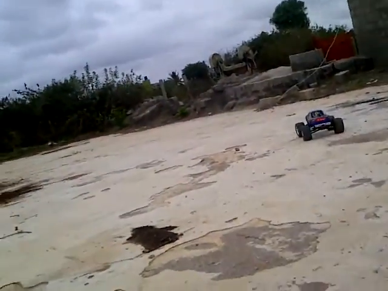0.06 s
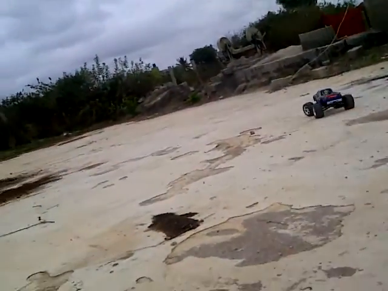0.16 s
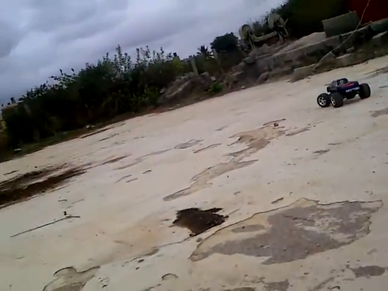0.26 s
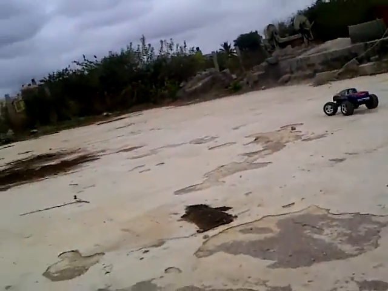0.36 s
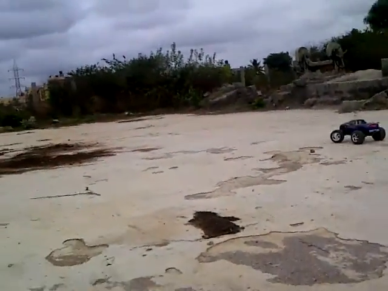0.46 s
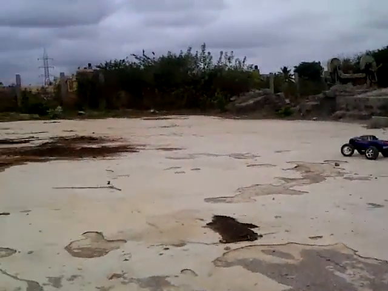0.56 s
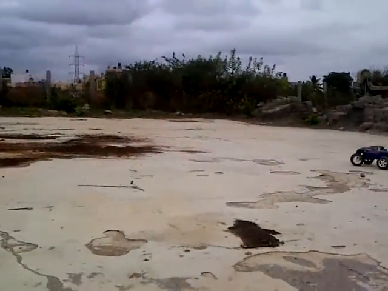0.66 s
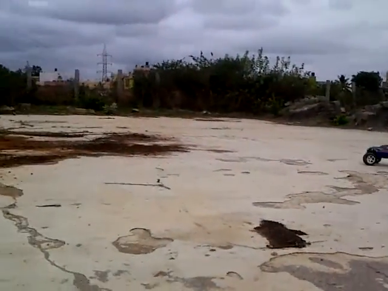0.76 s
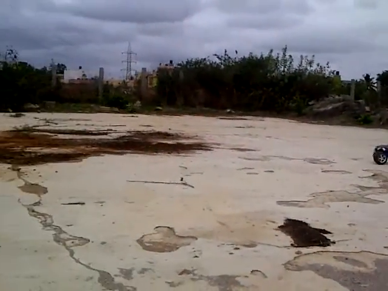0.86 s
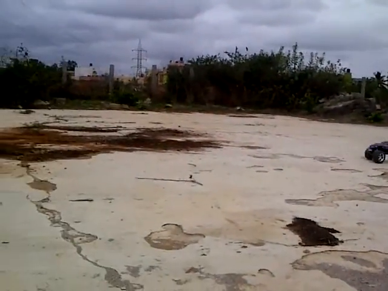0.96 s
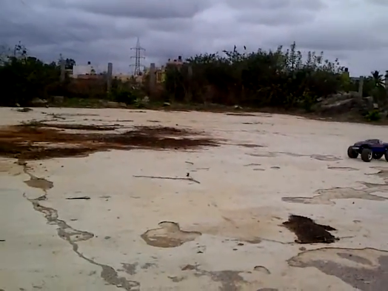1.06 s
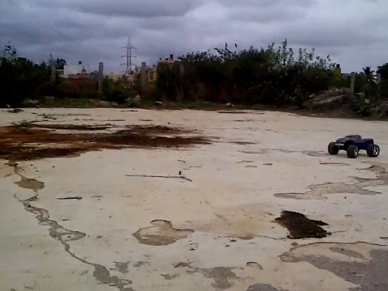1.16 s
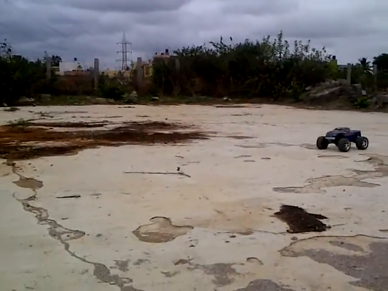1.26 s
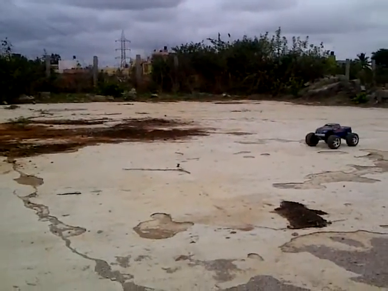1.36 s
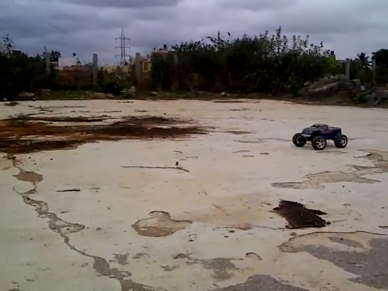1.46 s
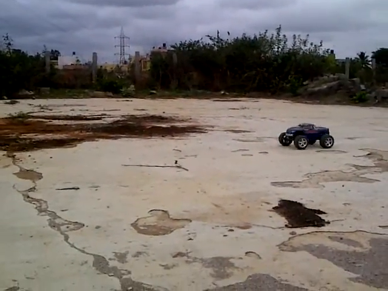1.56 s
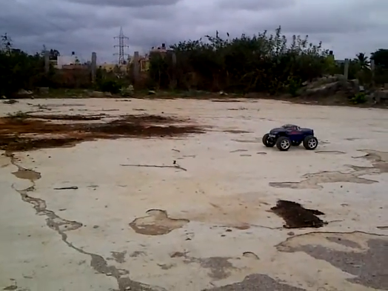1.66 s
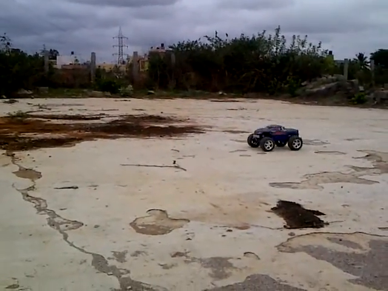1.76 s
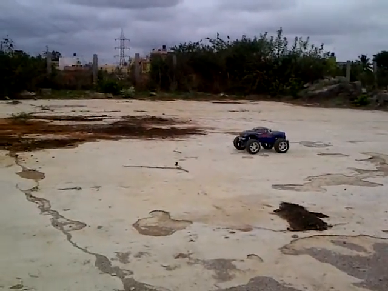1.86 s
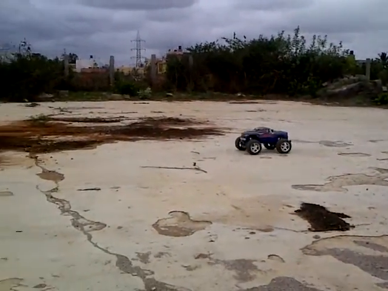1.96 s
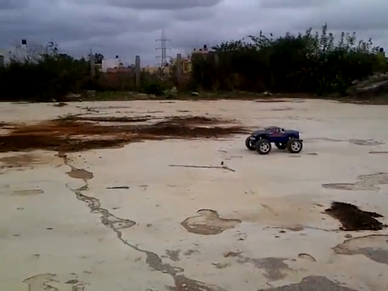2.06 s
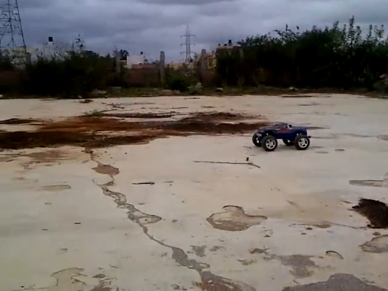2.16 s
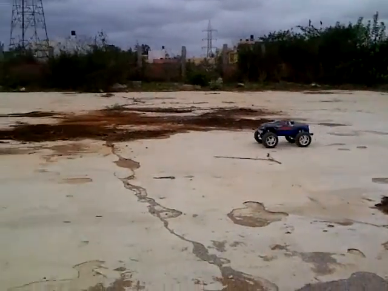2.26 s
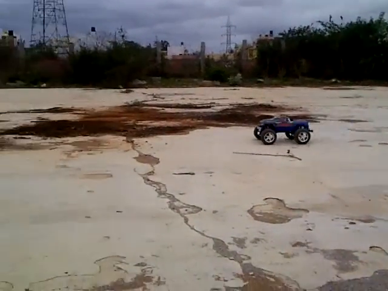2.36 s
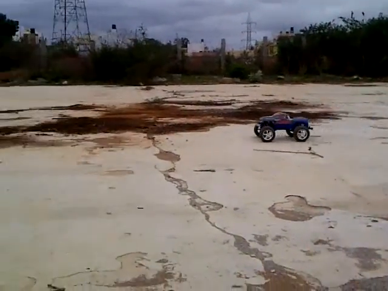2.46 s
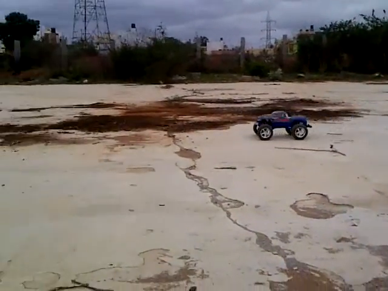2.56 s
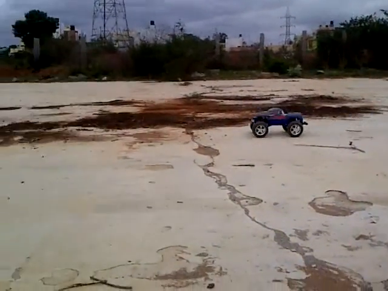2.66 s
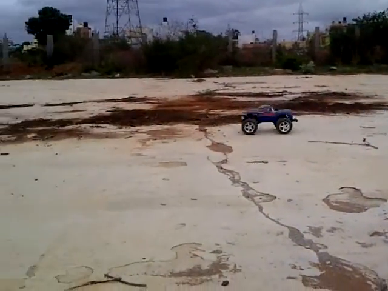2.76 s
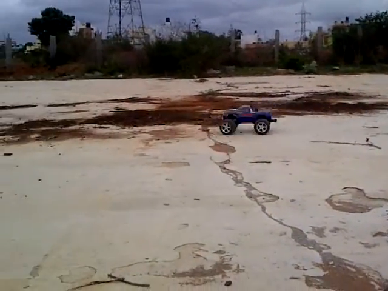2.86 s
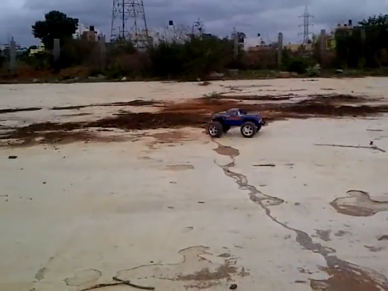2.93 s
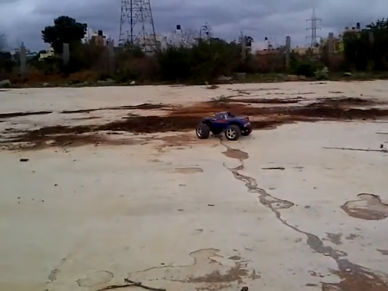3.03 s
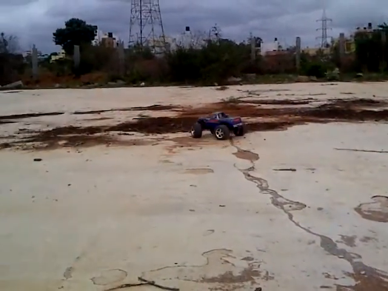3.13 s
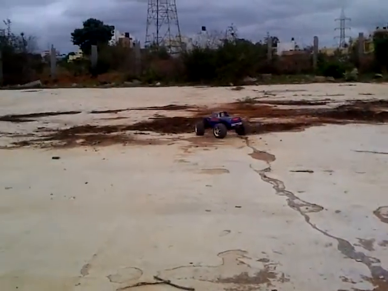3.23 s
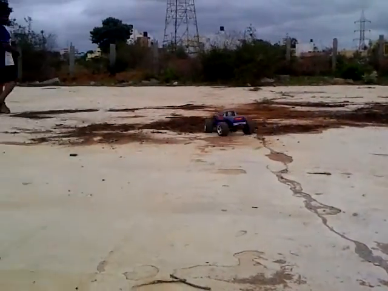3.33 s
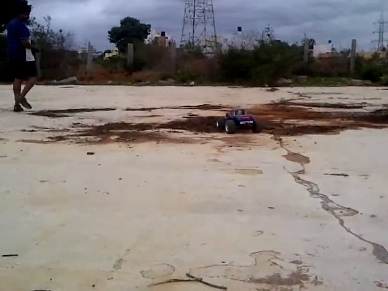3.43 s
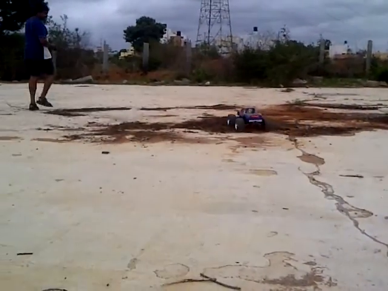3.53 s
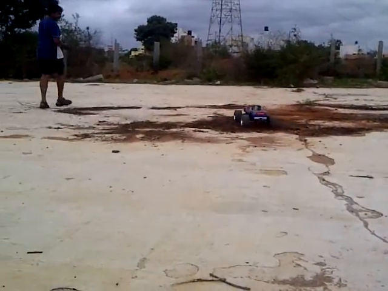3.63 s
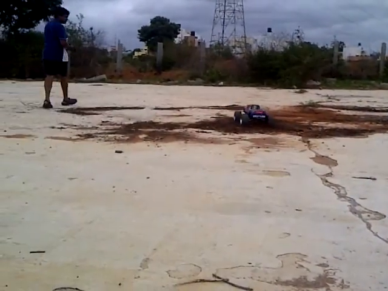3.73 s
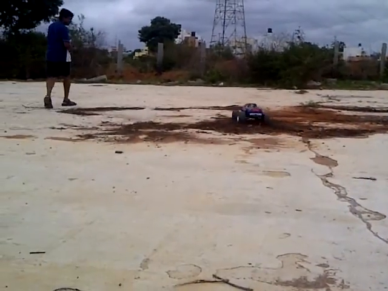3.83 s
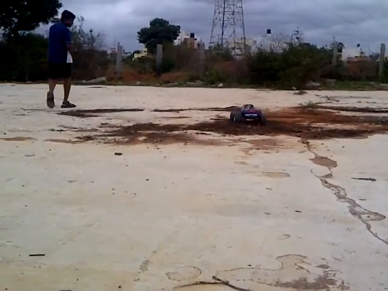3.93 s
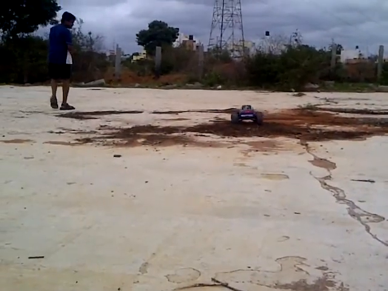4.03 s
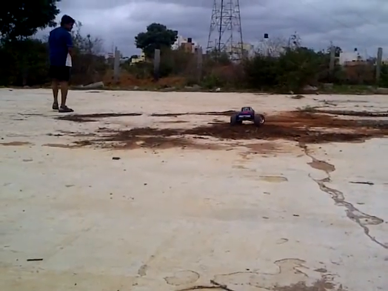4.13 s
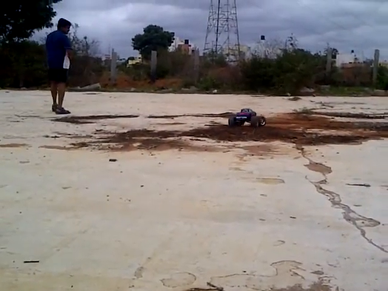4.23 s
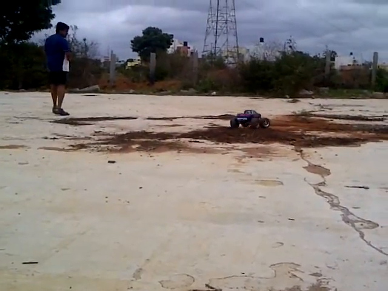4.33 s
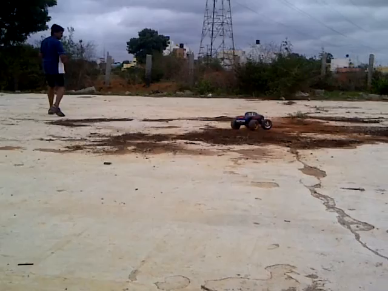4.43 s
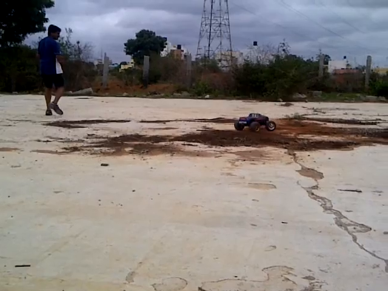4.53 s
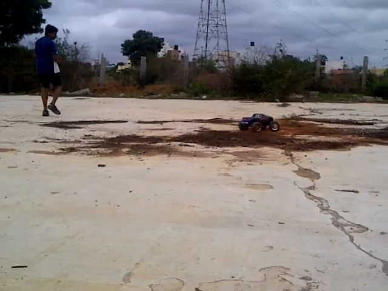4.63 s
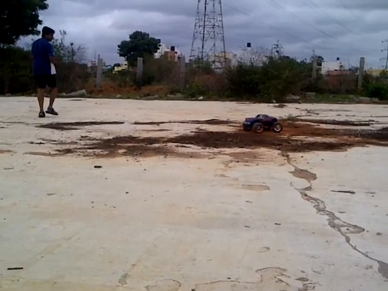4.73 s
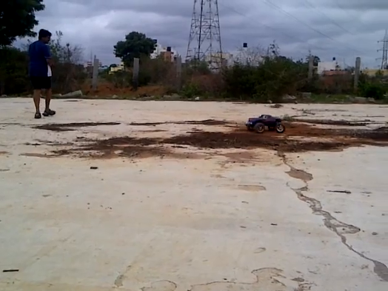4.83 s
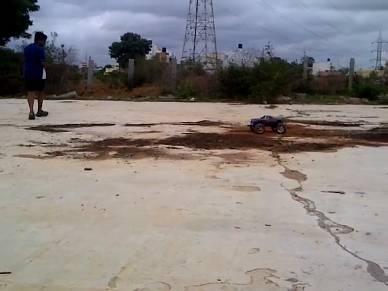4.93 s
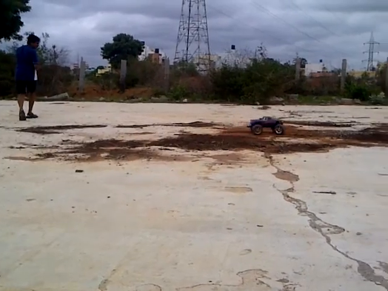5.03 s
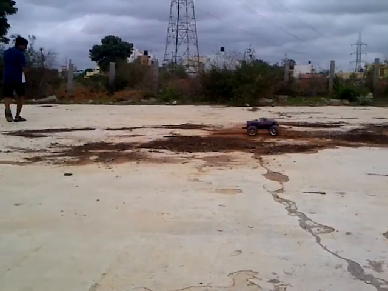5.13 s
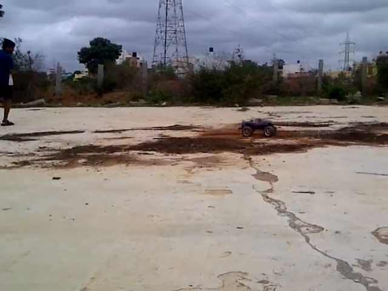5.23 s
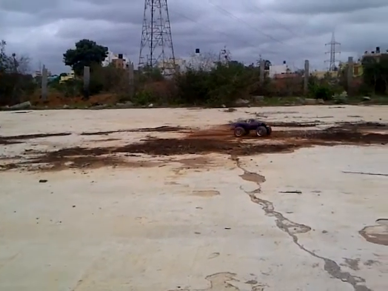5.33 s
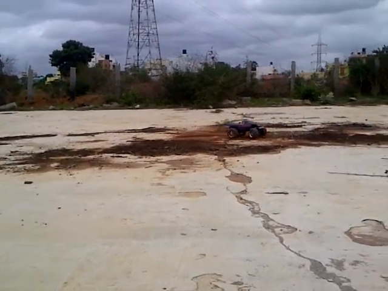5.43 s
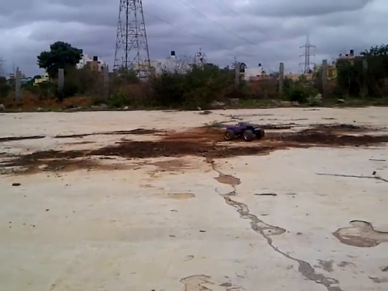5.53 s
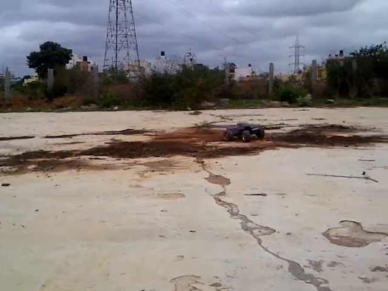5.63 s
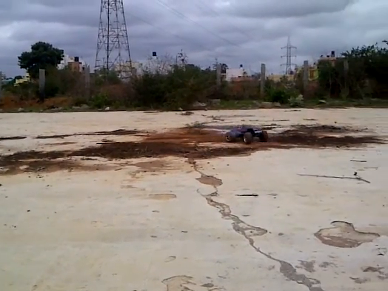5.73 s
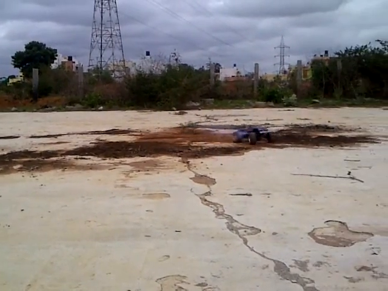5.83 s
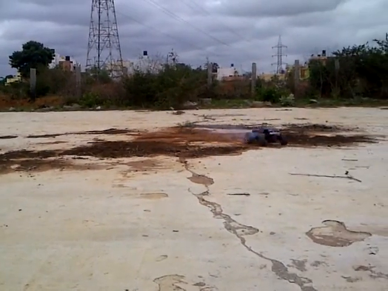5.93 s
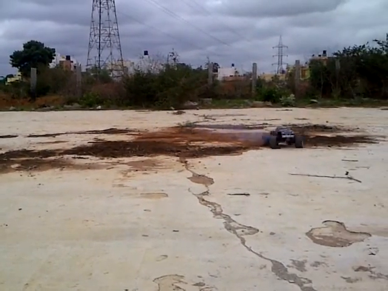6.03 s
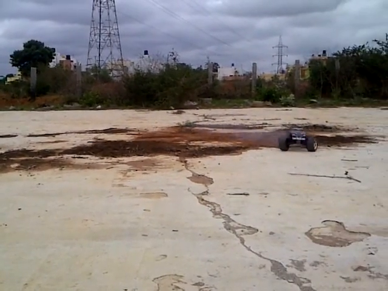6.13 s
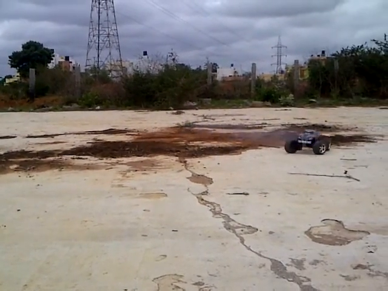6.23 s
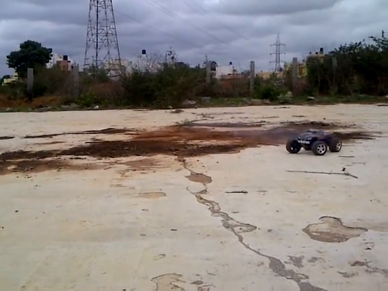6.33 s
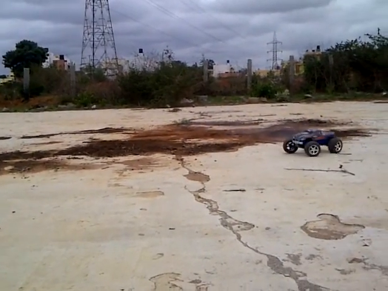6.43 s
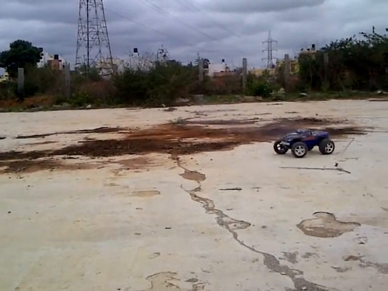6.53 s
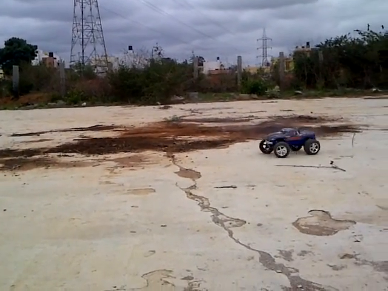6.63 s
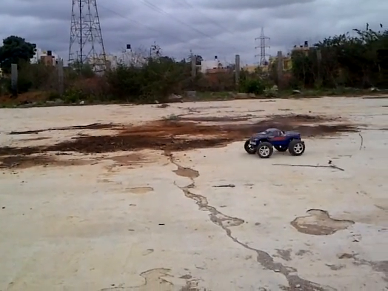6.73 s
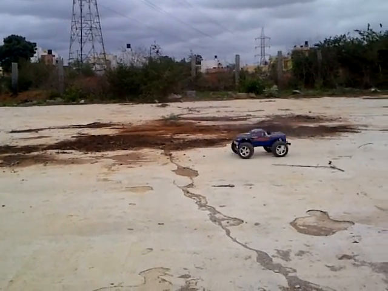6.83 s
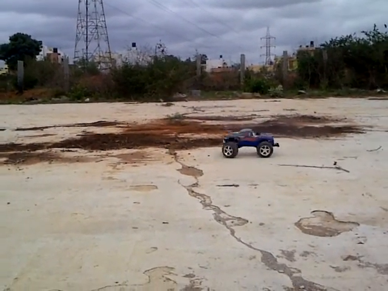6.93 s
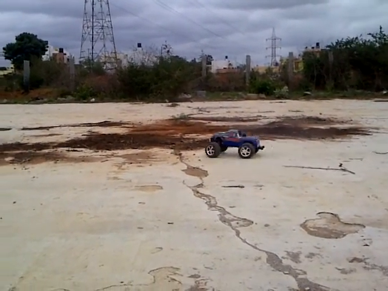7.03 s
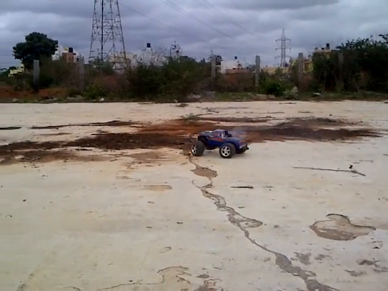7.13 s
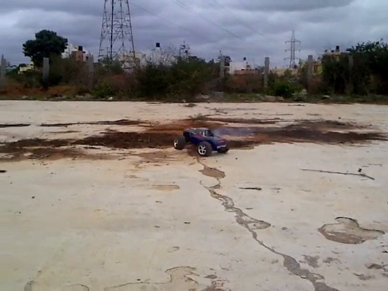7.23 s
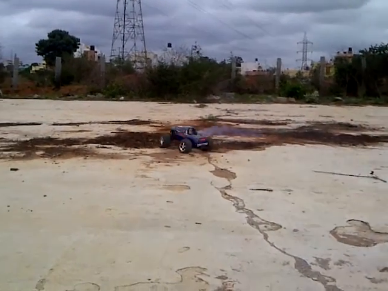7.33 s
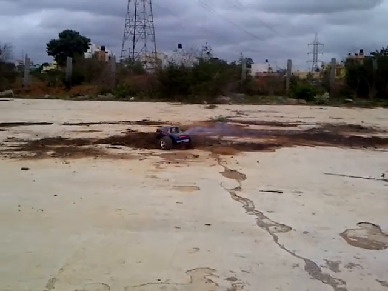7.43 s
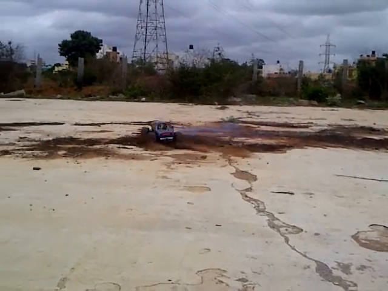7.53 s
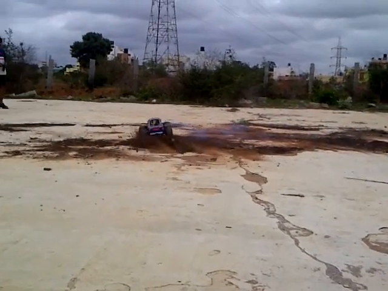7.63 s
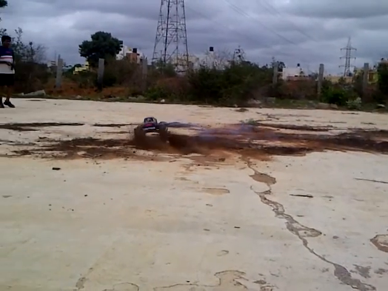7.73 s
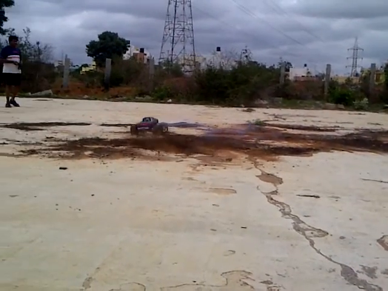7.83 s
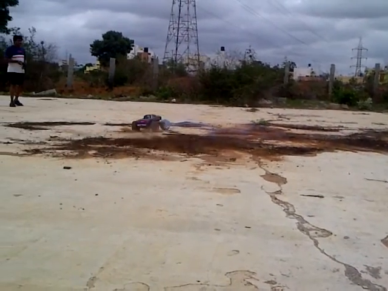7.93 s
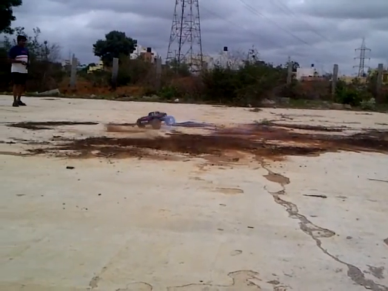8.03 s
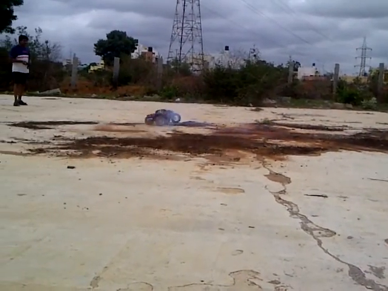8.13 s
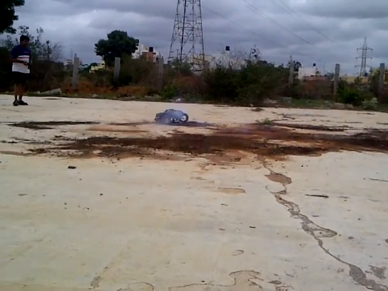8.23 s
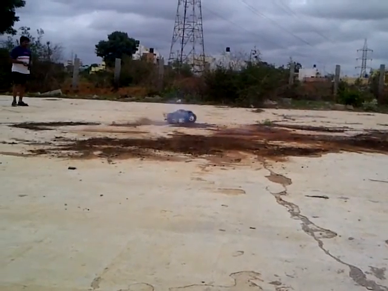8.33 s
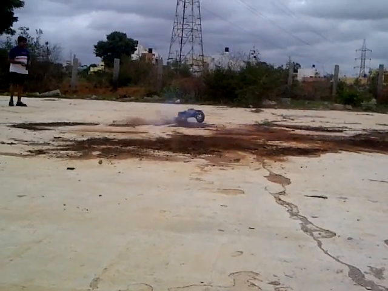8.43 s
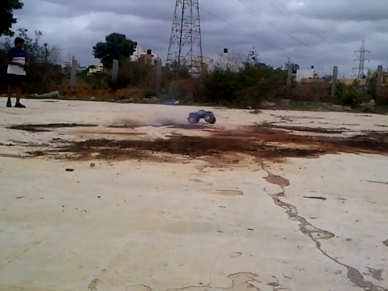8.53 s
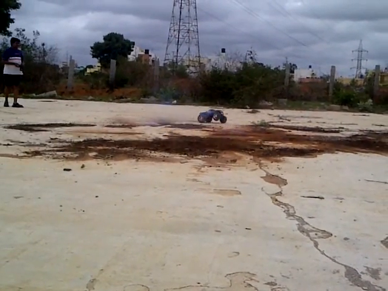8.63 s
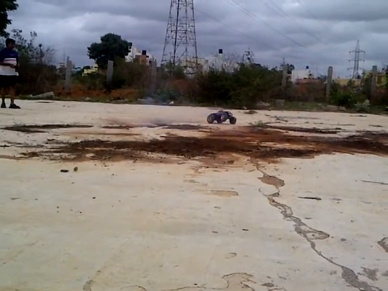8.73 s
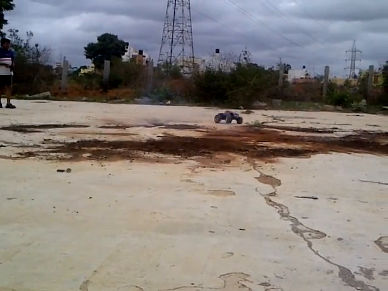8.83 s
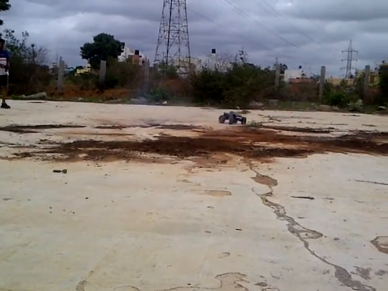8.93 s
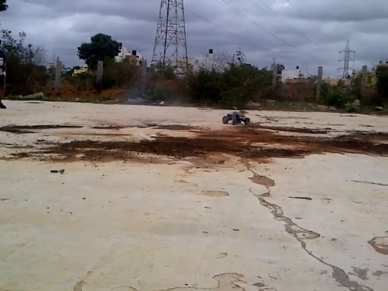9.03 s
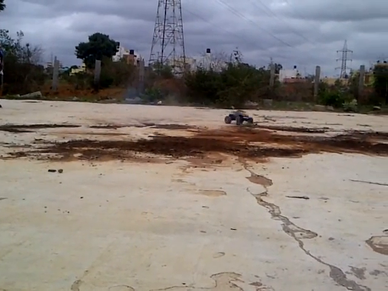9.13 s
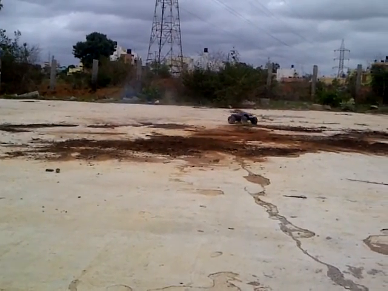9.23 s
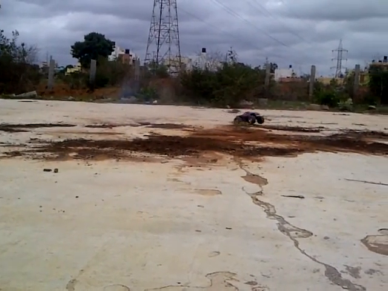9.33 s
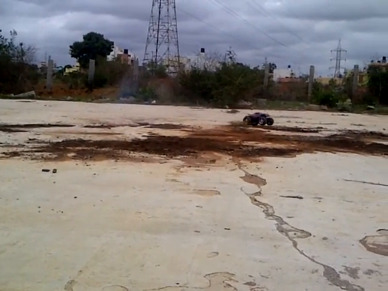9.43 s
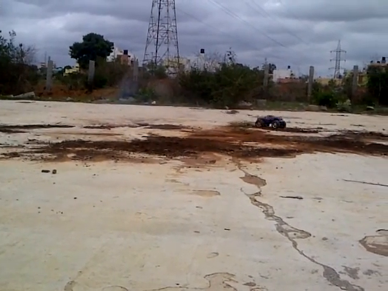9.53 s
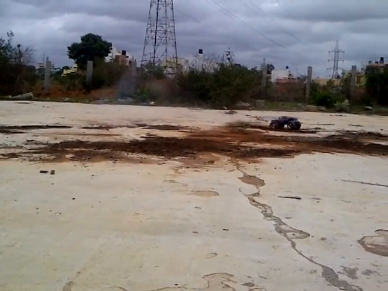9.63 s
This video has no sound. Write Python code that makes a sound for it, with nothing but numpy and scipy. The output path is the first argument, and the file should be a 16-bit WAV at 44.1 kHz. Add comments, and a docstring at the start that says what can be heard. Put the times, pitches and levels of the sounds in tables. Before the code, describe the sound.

A toy truck's tiny two-stroke engine buzzes steadily at idle, blips once, then screams at full throttle, falls and revs again.

```python
"""A concrete lot: a remote-controlled truck's two-stroke nitro engine idles, then revs up and down.
Each firing gives a low-order hum, a buzz through the tuned pipe and a puff of gas; the colour shifts
as the truck turns. The chassis ticks. A far wall and bushes answer; wind buffets the one microphone."""
import sys
import numpy as np
from scipy import signal
from scipy.fft import rfft, irfft, next_fast_len
from scipy.io import wavfile
from scipy.ndimage import uniform_filter1d, map_coordinates

SR = 44100
rng = np.random.default_rng(int(sys.argv[2]) if len(sys.argv) > 2 else 0)


def dump(signal):
    """Clip the signal to [-1, 1] and save it as 16-bit WAV at the path in sys.argv[1]."""
    limited = np.clip(np.atleast_2d(signal).T, -1, 1)
    pcm = np.round(limited * 32767).astype(np.int16)
    wavfile.write(sys.argv[1], SR, pcm)


N = 427329
T = np.arange(N) / SR
FFT_SIZE = next_fast_len(N + SR // 4)
BIN_HZ = np.fft.rfftfreq(FFT_SIZE, 1 / SR)


def engine(idle_hz=202):
    """Firings and gas puffs excite the pipe's resonances; speed sets level and roughness."""
    # crank speed: (time [s], firing rate [Hz])
    idle = [(0.0, 203.9), (0.32, 203.3), (0.8, 199.6), (1.15, 202.0), (1.55, 197.9), (1.75, 203.5),
            (2.5, 201.3), (2.95, 199.6), (3.3, 202.5), (4.15, 198.2), (4.45, 203.5), (5.17, 202.9)]
    blip = [(5.49, 224.6), (5.75, 237), (5.81, 258.6), (5.93, 280.9), (5.99, 320.2), (6.06, 328.6),
            (6.24, 254.5), (6.4, 213.1), (6.86, 205.1)]
    full_throttle = [(7.13, 243), (7.26, 236.2), (7.38, 271.3), (7.42, 319.6), (7.47, 339), (7.52, 379.4),
                     (7.632, 357.6), (7.74, 367.6), (7.81, 449.5), (7.99, 389.3), (8.14, 416.7),
                     (8.35, 472.7), (8.509, 457.2), (8.6, 479.4), (8.75, 463.3), (8.86, 424.2), (9.0, 358),
                     (9.14, 282.6), (9.271, 222)]
    pull_away = [(9.371, 243), (9.46, 242), (9.54, 278.5), (9.61, 375.4), (9.69, 383)]
    # band levels as the truck turns and moves: (time [s], level [dB])
    hum_level = [(0.0, 4.1), (0.84, 8.5), (1.91, 4), (2.72, 14), (3.63, 4.5), (5.29, 16), (5.76, 4),
                 (5.99, -2.7), (6.97, 9), (7.8, -9), (7.9, -2.5), (8.17, -8), (8.54, -15.5), (8.89, -10.5),
                 (9.37, 13), (9.69, -2.5)]
    ring_level = [(0.0, 1.5), (0.69, 0.7), (0.8, -1), (1.91, 1.5), (2.85, -0.5), (3.35, 1.5), (3.82, 0.5),
                  (4.26, -6), (4.58, -7.5), (4.81, 0.5), (5.4, 1.5), (5.7, -2.5), (6.15, 5.5), (6.23, 0.9),
                  (7.25, 2), (7.37, 5), (7.98, 0), (8.13, 1.5), (8.46, -9), (9.02, -0.3), (9.37, -5.5),
                  (9.69, -16)]
    treble_level = [(0.0, 1), (0.15, 1), (0.94, -1.5), (1.91, 1.3), (2.88, -2), (3.3, -0.1), (4.17, -8),
                    (4.43, -5.9), (5.34, -5.5), (5.72, 1), (6.14, 5.5), (6.84, 0), (7.18, 8), (7.449, 6.5),
                    (7.66, -1.5), (8.18, 2), (9.22, 1.5), (9.31, -8), (9.51, 4.5), (9.69, 3)]
    whistle_level = [(0.0, 0.7), (0.92, -4.4), (4.31, -4.5), (4.43, 4.5), (5.84, 5), (5.96, -1.5),
                     (6.98, -3.5), (7.16, -4.1), (8.1, 9), (8.96, -0.5), (9.69, 4.5)]
    # voice: (idle level [dB], growth with speed [dB/octave], share of ring level, share of treble level)
    voices = {"gas": (-34, 4.5, 0.37, .3), "pipe": (-31.5, 0, 2, 0), "bark": (-33, 4.1, 0.6, 0.82),
              "second mode": (-42.5, -1.5, 0, 0.9), "third mode": (-50.5, 11.5, 0, 2.05),
              "rasp": (-30.5, 3.5, 0, 1.16), "whistle": (-33.5, 5, 0, 0)}
    # gas and pipe colours: (frequency [Hz], relative level [dB])
    gas_colour = [(30, -23), (130, -20), (175, -14), (230, -4), (330, -0.5), (650, 4), (900, 1),
                  (1250, 2.5), (2000, -5), (3500, -42.5)]
    pipe_colour = [(900, -36.5), (1280, -17), (1410, -10.5), (1510, -2.5), (1615, -5), (1730, -10),
                   (1880, -19), (2150, -60.5)]
    bark_colour = [(1550, -58), (1880, -1), (2150, 2.5), (2430, 0.5), (2680, -4), (2870, 0.5), (3150, 0.5),
                   (3700, -52.5)]
    second_mode = [(2100, -35.5), (2450, -7), (2590, -2.5), (2740, -13), (3100, -44)]
    third_mode = [(3000, -49.5), (3450, 7), (3680, -7), (3900, 4.5), (4500, -41.5)]
    rasp_colour = [(2600, -31), (3250, -0.5), (3600, -5.5), (4000, 2), (4350, 1.5), (4700, 0), (5100, 0),
                   (5480, -0.5), (5800, -0.5), (6400, -2.5), (6900, -10.5), (7400, -32.5)]
    # 7 kHz whistle and shriek, faint recorder fizz above 8 kHz: (frequency [Hz], relative level [dB])
    whistle_colour = [(6000, -30), (6600, -13.5), (6930, -9.5), (7130, 3), (7260, -4), (7420, 1),
                      (7620, -12.5), (7900, -17.5), (8300, -18), (8700, -15.5), (9100, -35)]
    shriek_colour = [(5700, -37.5), (6200, -9), (6480, -0.5), (6750, -5.5), (7000, -5.5), (7450, -2.5),
                     (7750, -3.5), (8300, -8), (8700, -20), (9100, -27)]

    speed_hz = curve(np.vstack([idle, blip, full_throttle, pull_away]))
    octaves = np.log2(speed_hz / idle_hz)
    revs = np.clip((speed_hz - idle_hz) / (speed_hz.max() - idle_hz), 0, 1)
    pulling, coasting = load(octaves)
    ring_db, treble_db = curve(ring_level), curve(treble_level)
    level_db = {name: idle_db + growth_db * octaves + ring * ring_db + treble * treble_db
                for name, (idle_db, growth_db, ring, treble) in voices.items()}
    bark_rough = roughness(revs, pulling, at_idle=0.58, at_top=0.29, exponent=0.53) + 0.12 * coasting
    treble_rough = roughness(revs, pulling, at_idle=1, at_top=0.057, exponent=0.55) + 0.15 * coasting
    angle, strength, stumble = crank(speed_hz, waver=0.0009974 + 0.005985 * coasting)
    tone = buzz(angle, speed_hz, revs)

    def voice(rough, colour, db):
        """Buzz mixed with gas noise, through one resonance."""
        share = np.clip(rough, 0, 1)
        source = np.sqrt(1 - share) * tone + np.sqrt(share) * puffs(angle, depth=0.22)
        return amp(db) * coloured(strength * source, colour)

    drive_db = 20 * octaves - 10.5 * coasting  # falters off the throttle
    low = strength * hum(angle, speed_hz, curve(hum_level), treble_db, drive_db, 1 + 5 * coasting)
    gas = amp(level_db["gas"]) * unit(coloured(puffs(angle, depth=0.74), gas_colour))
    # sharp modes ring more cleanly than the broad bark
    pipe = voice(bark_rough ** 4, pipe_colour, level_db["pipe"])
    modes = voice(bark_rough ** 2, second_mode, level_db["second mode"])
    modes += voice(bark_rough ** 2, third_mode, level_db["third mode"])
    bark = voice(1.12 * bark_rough, bark_colour, level_db["bark"] + 3.2 * revs * wobble(78))
    rasp = voice(0.9 * treble_rough + 0.5 * revs ** 3, rasp_colour, level_db["rasp"] + 1.02 * wobble(160))
    # the idle's 7 kHz whistle swells with each stumble and widens to a shriek at high revs
    whistle_db = level_db["whistle"] + curve(whistle_level)
    sputter_db = 1.5 * stumble + 1.2 * wobble(81)
    whistle = np.sqrt(1 - revs) * voice(treble_rough, whistle_colour, whistle_db + sputter_db)
    shriek = np.sqrt(revs) * voice(treble_rough, shriek_colour, whistle_db + 0.42 * wobble(27))
    edge = body_shell(bark + rasp)
    return flaring(low + gas + pipe + modes + edge + whistle + shriek)


def load(octaves, full_pull_oct_s=0.5, full_coast_oct_s=3.3):
    """Pulling as speed rises, coasting as it falls, each 0-1."""
    rise_oct_s = np.gradient(uniform_filter1d(octaves, size=SR // 8)) * SR
    return np.clip(rise_oct_s / full_pull_oct_s, 0, 1), np.clip(-rise_oct_s / full_coast_oct_s, 0, 1)


def roughness(revs, pulling, at_idle, at_top, exponent):
    """Share of gas noise in a voice; firing gets cleaner with speed and load."""
    unloaded = at_idle + (at_top - at_idle) * revs ** exponent
    return np.clip(unloaded * (1 - 0.5 * pulling), 0, 1)


def crank(speed_hz, waver, judder=0.014, stumble_hz=42.2, stumble_rad=0.073, scatter_db=0.83):
    """Crank angle, firing strength, stumble. The idle hunts; under way the tyres shake the speed."""
    idling = (speed_hz.min() / speed_hz) ** 2
    shake = waver * wobble(45) + judder * (1 - idling) * np.sin(phase(19 + 7 * wobble(15)))
    hunting = 0.006 * idling * wobble(11)
    angle = phase(speed_hz * (1 + shake + hunting))
    stumble = idling * np.sin(phase(stumble_hz * (1 + 0.1935 * wobble(25))))
    strength = unit(amp(scatter_db * wobble(200)))
    return angle + stumble_rad * stumble, strength, stumble


def hum(angle, speed_hz, turn_db, treble_db, drive_db, flutter_db, drift_db=1.45):
    """The five lowest exhaust orders sweep through the silencer's resonances."""
    # silencer response: (frequency [Hz], level [dB], share of treble level)
    silencer = [(197.2, -52.5, 0.48), (278, -38, -0.082), (371, -46, 0.14), (458, -38, 1.92),
                (543, -43.5, 1.88), (620, -41, 0.87), (726, -41.5, 1.05), (872, -50, 0.48),
                (1020, -41, 0.43), (1130, -37, 0.027), (1400, -51, 0.72), (1650, -43, 0.19),
                (2260, -45, -1.7)]
    hz, db, share = np.transpose(silencer)
    out = np.zeros(N)
    for k in range(1, 6):
        log_hz = np.log(k * speed_hz)
        response_db = np.interp(log_hz, np.log(hz), db)
        treble_share = np.interp(log_hz, np.log(hz), share)
        turn_share = 0.56 if k <= 2 else 1  # the lowest orders spread all round
        line_db = drive_db + response_db + treble_share * treble_db + turn_share * turn_db
        wander_db = drift_db * wobble(6) + flutter_db * wobble(24)
        out += amp(line_db + wander_db) * np.sin(k * angle + rng.uniform(0, 2 * np.pi))
    return np.sqrt(2) * out


def buzz(angle, speed_hz, revs, flutter_db=6, flutter_hz=22):
    """Upper orders at the power density of unit white noise; each flutters on its own at speed."""
    orders = range(6, 45)
    depth = np.log(10) / 20 * flutter_db * revs
    out = np.zeros(N)
    for k in orders:
        gain = np.exp(depth * wobble(flutter_hz) - depth ** 2)
        out += gain * np.cos(k * angle + rng.uniform(0, 2 * np.pi))
    return unit(out) * np.sqrt(len(orders) * speed_hz / (SR / 2))


def puffs(angle, depth):
    """Turbulent gas, let out once a turn as the port opens."""
    return unit(rng.standard_normal(N) * np.exp(depth * np.cos(angle)))


def flaring(x):
    """Pipe and silencer resonances swell briefly as the truck turns."""
    # resonance: (centre [Hz], Gaussian width [Hz])
    resonances = {"bite": (1000, 110), "snarl": (2120, 135.3), "ring": (1615, 44),
                  "second mode": (2600, 120), "third mode": (3640, 67)}
    # (time [s], resonance, rise [dB], Gaussian width [s])
    flares = [(0.623, "second mode", 9, 0.06), (1.65, "ring", 3, .4), (3.3, "second mode", 7.5, 0.1),
              (3.55, "ring", 2.5, .25), (4.3, "second mode", 7.5, 0.21), (5.136, "second mode", 9, 0.086),
              (5.746, "bite", 12, 0.18), (6.078, "snarl", 4, 0.035), (7.343, "second mode", 8, 0.031),
              (7.528, "snarl", 12, 0.045), (7.554, "bite", 9, 0.11), (8.076, "snarl", 7, 0.28),
              (8.566, "third mode", 8, .17), (9.62, "bite", 4, 0.075)]
    spectrum = rfft(x, FFT_SIZE)
    out = x.copy()
    for name, (hz, width_hz) in resonances.items():
        rise_db = sum(db * gaussian(T, s, width_s) for s, which, db, width_s in flares if which == name)
        band = irfft(spectrum * gaussian(BIN_HZ, hz, width_hz), FFT_SIZE)[:N]
        out += (amp(rise_db) - 1) * band
    return out


def body_shell(x, delay_s=0.001113, drift=0.052, drift_hz=1.5, echo_db=-9):
    """Two reflections under the shell; their drifting delays shift a metallic colour."""
    delays_s = [k * delay_s * np.exp(drift * wobble(drift_hz)) for k in (1, 2)]
    echoes = sum(map_coordinates(x, [(T - lag_s) * SR], order=3) for lag_s in delays_s)
    return (x + amp(echo_db) * echoes) / np.sqrt(1 + 2 * amp(echo_db) ** 2)


def chassis_ticks(gain_db=-4.5, t60_s=0.037):
    """The chassis clicks as the truck rolls over cracks."""
    # (time [s], relative peak [dB])
    ticks = [(1.5867, -13), (3.0285, -15), (3.049, -16.5)]
    # (frequency [Hz], relative level [dB])
    tick_colour = [(1500, -24.5), (3000, -11), (4300, -6.5), (6000, -14.5), (7500, -17.5), (9000, -27.5)]
    envelope = sum(amp(db + gain_db - 60 * np.abs(T - s) / t60_s) * (T > s) for s, db in ticks)
    return envelope * coloured(rng.standard_normal(N), tick_colour)


def lot(x, echo_s=0.075, echo_db=-15.5, scatter_db=-11.5, t60_s=0.56, onset_s=0.0078):
    """One wall echo and a thin tail from rubble and bushes."""
    t = np.arange(SR // 2) / SR
    response = rng.standard_normal(len(t)) * amp(-60 * t / t60_s) * (1 - np.exp(-t / onset_s))
    response *= amp(scatter_db) / np.linalg.norm(response)
    response[int(echo_s * SR)] += amp(echo_db)
    return signal.fftconvolve(x, response)[:N]


def wind():
    """Short low thumps of air on the microphone port."""
    # (time [s], level [dB], Gaussian width [s])
    buffets = [(0.556, -26, 0.012), (0.679, -18, 0.0058), (0.685, -14, 0.0045), (0.71, -27.5, 0.038),
               (0.749, -29.5, 0.0064), (0.783, -17, 0.0068), (0.807, -16, 0.0066), (3.25, -25, 0.012),
               (3.281, -30, 0.01), (3.695, -27, 0.012), (5.062, -31, .011)]
    # (frequency [Hz], relative level [dB])
    eddy_colour = [(40, -47), (140, -37.5), (230, 1.5), (330, 1.5), (480, -1.5), (750, -17.5), (1100, -29),
                   (2000, -77)]
    swell = sum(amp(db) * gaussian(T, s, width_s) for s, db, width_s in buffets)
    eddies = coloured(rng.standard_normal(N), eddy_colour)
    local_rms = np.sqrt(np.abs(uniform_filter1d(eddies ** 2, size=700)) + 1e-9)
    return swell * eddies / local_rms


def amp(db):
    """Decibels to gain."""
    return 10 ** (np.asarray(db) / 20)


def unit(x):
    """x at rms 1."""
    return x / np.sqrt(np.mean(x ** 2) + 1e-20)


def phase(hz):
    """Running phase [rad]."""
    return 2 * np.pi * np.cumsum(hz) / SR


def gaussian(x, centre, width):
    """Bell curve, peak 1."""
    return np.exp(-0.5 * ((x - centre) / width) ** 2)


def curve(rows):
    """(time [s], value) rows, interpolated per sample."""
    return np.interp(T, *np.transpose(rows))


def wobble(rate_hz):
    """Random curve, rms near 1, with knots at rate_hz."""
    knots = np.random.default_rng(rng.integers(2 ** 31)).standard_normal(int(T[-1] * rate_hz) + 3)
    return np.sqrt(3 / 2) * np.interp(T * rate_hz, np.arange(len(knots)), knots)


def coloured(x, points, keep_power=True):
    """Filter by (frequency [Hz], gain [dB]) points; with keep_power, white noise keeps its rms."""
    hz, db = np.transpose(points)
    gain = amp(np.interp(np.log(BIN_HZ + 1), np.log(hz), db))
    return irfft(rfft(x, FFT_SIZE) * (unit(gain) if keep_power else gain), FFT_SIZE)[:N]


def scene():
    """The truck, its reflections and the wind."""
    truck = engine() + chassis_ticks()
    mono = truck + lot(truck) + wind()
    return np.array([mono, mono])


def record(dry):
    """One band-limited pickup with a deep dip at 8 kHz, on both channels."""
    # (frequency [Hz], gain [dB])
    pickup_response = [(30, -3.5), (70, -5), (160, -1), (7880, -1), (8000, -21), (8130, -3), (8750, -8),
                       (9000, -18)]
    top_hz = 9109
    mono = coloured(dry[0], pickup_response, keep_power=False)
    mono = irfft(rfft(mono, FFT_SIZE) * (BIN_HZ < top_hz), FFT_SIZE)[:N]
    return np.array([mono, mono])


dry = scene()
out = record(dry)
dump(out)
```